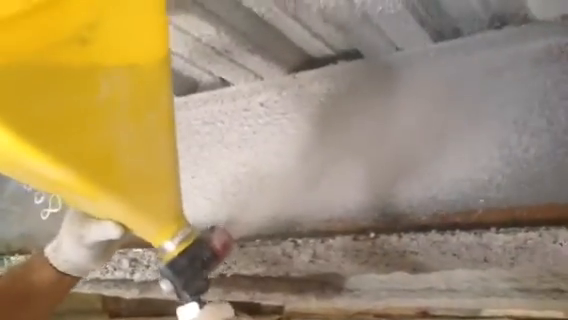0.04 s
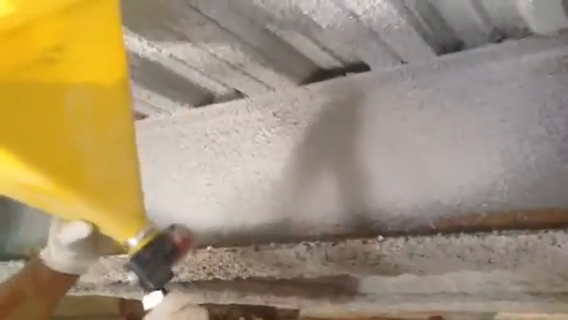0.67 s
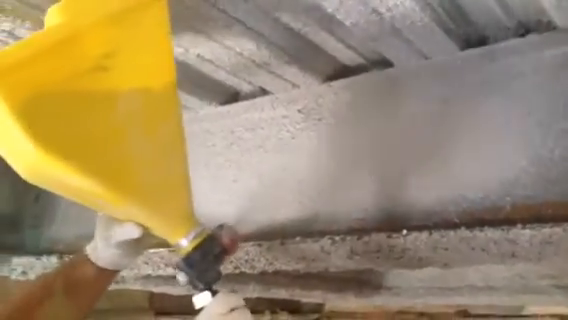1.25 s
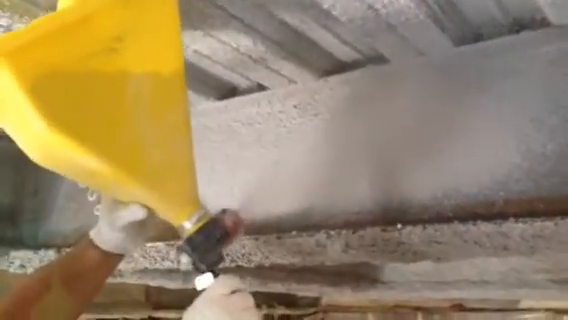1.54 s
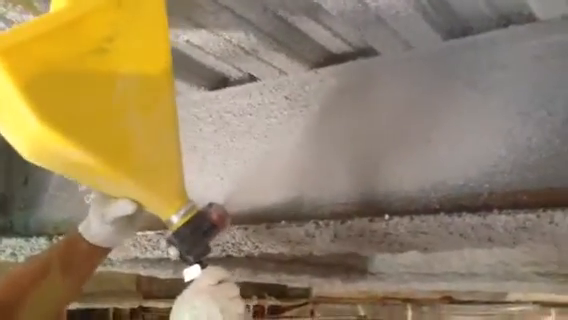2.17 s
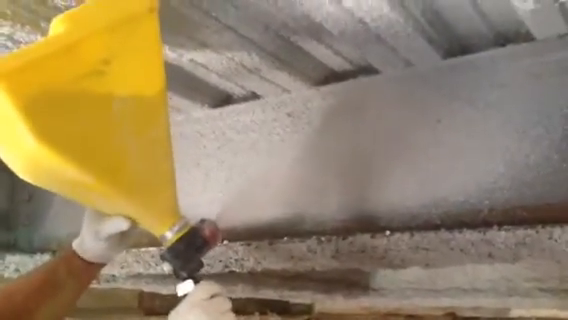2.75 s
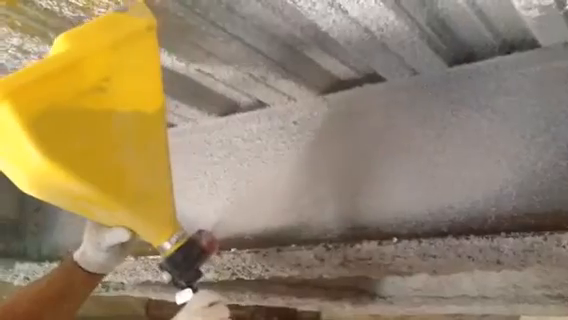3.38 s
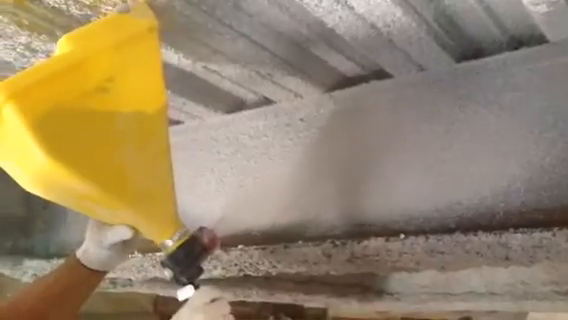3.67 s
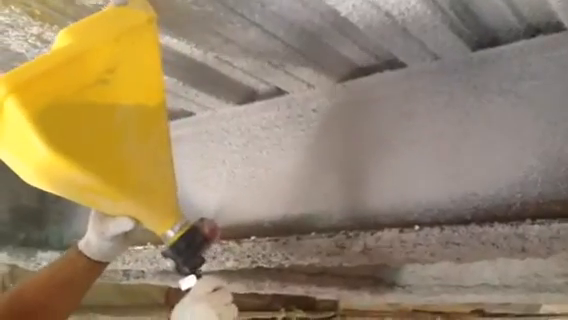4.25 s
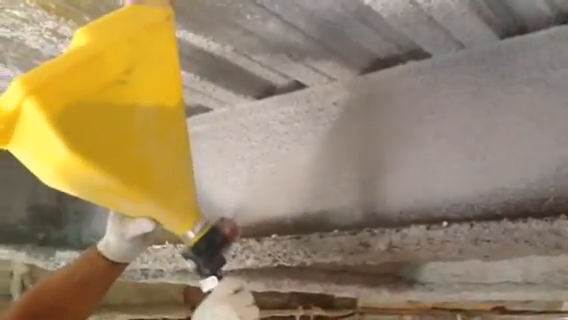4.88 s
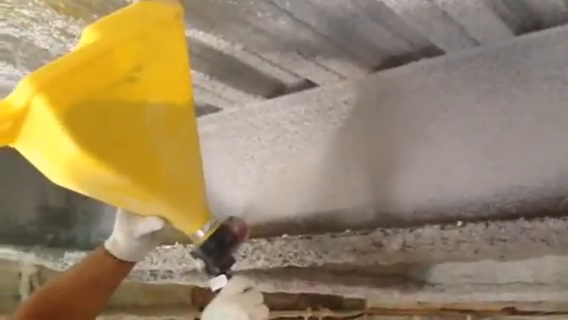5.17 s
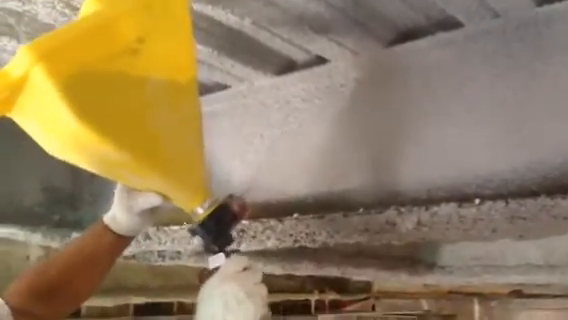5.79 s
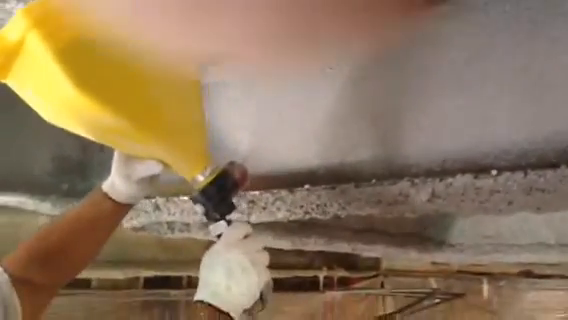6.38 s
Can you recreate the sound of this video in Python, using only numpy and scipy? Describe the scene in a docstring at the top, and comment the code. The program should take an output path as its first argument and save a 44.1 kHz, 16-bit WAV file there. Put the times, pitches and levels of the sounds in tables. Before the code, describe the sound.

A short burst of loud hiss from a nearby spray gun stops, and for a second only seeping air and a distant, humming compressor are heard in the building. Then the gun opens again abruptly and keeps spraying, a sharp rush of air with a fast, wet, gurgling splutter underneath. The sound is mono, with only a slight room echo.

```python
"""Hopper gun spraying a ceiling beam

An air-driven gun sprays wet coating; the air is shut off for a second, then opened again.
The jet hisses, coloured by the gap between gun and beam, and splutters about ten times a second
as gulps of mix drop into it. A compressor hums and clatters further off in the building. Mono."""
import sys
import numpy as np
from scipy import signal
from scipy.fft import rfft, irfft, next_fast_len
from scipy.io import wavfile
from scipy.ndimage import uniform_filter1d, map_coordinates

SR = 44100
rng = np.random.default_rng(int(sys.argv[2]) if len(sys.argv) > 2 else 0)


def store_wav(level_fs):
    """Save 16-bit WAV to argv[1]."""
    pcm = np.round(np.clip(np.atleast_2d(level_fs), -1, 1) * 32767)
    wavfile.write(sys.argv[1], SR, pcm.T.astype(np.int16))


N = 292383
T = np.arange(N) / SR
HZ, FRAMES, _ = signal.stft(T, SR, nperseg=1024)  # frequency and time grid of the moving filters
SHUT_S, OPEN_S = .21, 1.2865  # the air valve


def jet(swing_db):
    """Air tears through the nozzle, brighter in a surge; the resonances glide from aim to aim."""
    # strength of the jet: time_s, level_db
    jet_level = [(0.0, -14.9), (1.33, -15.6), (1.5, -16.4), (1.65, -14.5), (2.15, -16.9), (2.5, -17.1),
                 (2.6, -15.8), (2.8, -16.4), (3.0, -15.0), (3.1, -16.9), (3.25, -15.5), (3.5, -15.6),
                 (3.75, -14.4), (4.6, -16.0), (5.05, -15.2), (5.8, -15.7), (6.63, -14.9)]
    # tone of the hiss: freq_hz, level_db
    hiss = [(150, -42), (500, -18.5), (1000, -28), (2000, -10.5), (2850, -10.3), (3400, -4), (4500, -2),
            (5700, -3), (6600, -3.5), (8500, -2), (10500, -5), (12500, -7.4), (15500, -7.8)]
    # sheen on top of the hiss: time_s, brightness
    sheen = [(0.0, -2.7), (1.33, -1.1), (3.15, -2.3), (3.45, -3.8), (4.0, -4.5), (4.35, -3.6), (5.35, -4.2),
             (5.9, -2.1), (6.63, -4.1)]
    # resonances of the gap between gun and beam, one table per aim: pitch_hz, width_hz, level_db
    aim_first = [(2930, 120, -6.5), (3830, 130, -3), (4400, 150, 1), (4940, 260, 2.5), (5740, 170, 0),
                 (6430, 430, -1), (7900, 300, 0), (8630, 180, -2)]
    aim_low = [(2940, 72, -2.5), (3220, 110, -4), (3540, 68, -3), (4240, 320, -4), (5360, 280, 0),
               (6040, 110, 0), (7540, 640, -2.5), (8550, 220, -3), (9840, 690, -3)]
    aim_mid = [(3270, 50, -2.5), (3770, 110, -3.5), (4640, 400, -2), (5500, 99, -15), (5710, 200, 1.5),
               (6960, 160, -2), (8300, 240, -19), (9040, 270, -3.5), (10960, 680, -5.5)]
    aim_high = [(3470, 140, -7.5), (3870, 105, 2.5), (4320, 200, 2), (4770, 210, 1.5), (5400, 330, 2),
                (6570, 400, -1.5), (7920, 250, -1), (9200, 330, -4), (10400, 230, -7)]
    aim_late = [(3395, 140, -2.5), (3860, 130, 1), (4600, 380, -3), (4830, 140, -8), (5710, 190, -0.5),
                (6300, 200, -4), (7850, 350, -17), (9260, 210, -2.5), (9860, 160, -31)]
    aim_end = [(3480, 150, 2.3), (3950, 110, -4), (4420, 190, -4), (5680, 260, -3.5), (6400, 200, -6),
               (7450, 260, -3), (8300, 200, -8), (9000, 260, -3)]
    # when the gun reaches each aim: time_s
    aim_times = [.1, 1.75, 2.8, 4.3, 5.6, 6.3]
    aims = [aim_first, aim_low, aim_mid, aim_high, aim_late, aim_end]
    fades = [np.interp(FRAMES, aim_times, row) for row in np.eye(len(aims))]
    ringing = sum(resonances(aim) * fade for aim, fade in zip(aims, fades))
    brightness = curves(sheen, FRAMES)[0] + .3 * np.interp(FRAMES, T, swing_db)
    treble = np.clip((HZ[:, None] - 5000) / 3000, 0, 1)
    tone = np.sqrt(colour(hiss) ** 2 + amp(3.5) ** 2 * ringing) * hollow(width_hz=220)
    tone *= amp(1.1 * (brightness + .9) * treble)
    tone *= reflections(beam=.19, ribs=.31, drift_s=.00007)
    flutter_db = .5 * wobble(45) + .75 * wobble(300)
    air = shaped(droplets(per_s=830, spread_db=6, level_db=-11), tone)
    return amp(curves(jet_level)[0] + swing_db + flutter_db + .25) * air


def splutter(swell):
    """Wet mix is ripped apart in ragged pops that ring the hopper throat."""
    # flow of mix: time_s, level_db
    flow = [(0.0, -27.3), (1.33, -28.2), (1.9, -27.4), (2.45, -30.2), (2.6, -27.0), (3.55, -27.7),
            (3.75, -26.2), (4.9, -26.3), (5.1, -25.0), (5.8, -25.7), (6.63, -25.9)]
    # tone of the pops: freq_hz, level_db
    pop_tone = [(100, -18), (300, -11.5), (550, -13), (670, 0.5), (750, -13.5), (950, -4.5), (1150, -1.5),
                (1400, -1.5), (1600, 2), (2000, 3.5), (2180, -2.5), (2500, -5.5), (2800, -4), (5000, -9.5),
                (12000, -21)]
    # throat resonances (gurgle, ring, gulp, overtone): pitch_hz, width_hz, level_db
    throat_modes = [(830, 53, 0.5), (1910, 170, -1.5), (1023, 133, 0), (2377, 106, 1.5)]
    # filling of the throat, which lifts or damps the first two: time_s, gurgle_db, ring_db
    fill = [(0, 0, -6), (1.4, -4, 16), (1.65, 6, 12), (2.3, 4.5, 7), (3.2, 6.5, 3), (3.8, -4, -3),
            (6.63, -11, -5)]
    lifts_db = curves(fill, FRAMES) + [0, 0]
    throat = sum(resonances([mode]) * amp(db) ** 2 for mode, db in zip(throat_modes, lifts_db))
    tone = np.sqrt(colour(pop_tone) ** 2 + throat) * hollow(width_hz=130)
    tone *= reflections(beam=.1, ribs=.3, drift_s=.00025)
    tone /= np.sqrt(1 + (100 / (HZ[:, None] + 1)) ** 6)  # low cut at 100 Hz
    pops = unit(droplets(per_s=400, spread_db=2.5, level_db=-5) * amp(1.35 * wobble(160)))
    return amp(curves(flow)[0]) * swell * shaped(pops, tone)


def feed(steepness):
    """Each gulp of mix chokes the air, then the nozzle clears: returns splutter gain, air swing in dB."""
    # the hopper glugs like a bottle: time_s, gulps_per_s
    gulp_rate = [(0.2, 9.7), (1.32, 13.68), (1.57, 10.2), (1.77, 13.78), (1.94, 10.66), (2.35, 9.16),
                 (2.57, 10.15), (3.12, 10.34), (3.69, 8.96), (3.82, 11.07), (4.25, 9.86), (4.46, 11.39),
                 (4.93, 10.51), (5.17, 8.93), (5.52, 13.9), (5.65, 9.35), (5.99, 9.67), (6.6, 8.47)]
    # the air ducks in a gulp and surges between gulps: time_s, choke_db, surge_db
    air_swing = [(0, .6, 0), (1.35, .6, 1.6), (2.35, .7, 4), (2.6, .7, 0), (5.2, 1, 0), (6, 2.6, 0),
                 (6.25, 0, 0)]
    # thin stream between gulps, relative to the flow: time_s, level_db
    stream = [(0, -3.5), (1.4, -7), (2.7, -3), (4.2, -3), (5.2, -4.5)]
    # extra hard spits, over an ordinary gulp: time_s, boost_db
    spits = [(1.315, 2.5), (1.468, 2.5), (1.89, 2.5), (4.744, 3), (5.138, 2), (5.335, 2.5), (5.986, 2.5)]
    first_gulp_s, restart_gulp_s, spit_half_s = .051, 1.32, .03
    gulp_share, surge_share = .52, .3  # widths, as parts of a cycle
    gulp_db, scatter_db = 2.3, .7
    cycles = np.cumsum(curves(gulp_rate)[0]) / SR
    cycles -= np.interp(np.where(T < OPEN_S, first_gulp_s, restart_gulp_s), T, cycles)
    from_gulp = abs((cycles + .5) % 1 - .5)
    gulp = .5 ** ((2 * from_gulp / gulp_share) ** steepness)
    surge = np.exp(-((1 - 2 * from_gulp) / surge_share) ** 2)
    choke_db, surge_db = curves(air_swing)
    swing_db = surge_db * surge - choke_db * gulp
    spit_db = sum(db / (1 + ((T - s) / spit_half_s) ** 2) ** 2 for s, db in spits)
    gulp_gain = amp(gulp_db + spit_db + scatter_db * wobble(10)) * np.sqrt(gulp)
    swell = np.hypot(gulp_gain, amp(curves(stream)[0]))
    return swell, swing_db - uniform_filter1d(swing_db, SR // 3)


def droplets(per_s, spread_db, level_db):
    """Turbulence with the ticks of bursting drops on it."""
    ticks = (rng.random(N) < per_s / SR) * rng.choice([-1, 1], N)
    sizes = amp(spread_db * np.clip(noise(), -2, 2))
    return noise() + amp(level_db) * unit(ticks * sizes)


def valve(fall_db_per_s=560, rise_s=.01):
    """Air pressure at the nozzle, 0-1: it dies away when shut and snaps back when opened."""
    return amp(-fall_db_per_s * np.maximum(T - SHUT_S, 0)) + np.clip((T - OPEN_S) / rise_s, 0, 1)


def reflections(beam, ribs, drift_s, far_edge_s=.000205):
    """Moving comb: echoes off two edges of the beam and the ceiling ribs, shifting as the hand sways."""
    # echo off the beam as the gun moves along it: time_s, delay_s, far_edge_share
    beam_echo = [(0, .00105, .8), (1.3, .00099, .7), (1.75, .000942, .8), (2.6, .000895, .7),
                 (3.05, .000888, .7), (3.6, .00088, .1), (4.2, .000862, 0), (5.1, .000878, .2),
                 (5.8, .000887, .2), (6.63, .00102, .8)]
    echo = lambda delay_s: np.exp(-2j * np.pi * HZ[:, None] * delay_s)
    near_s, far_share = curves(beam_echo, FRAMES)
    edges = 1 + beam * ((1 - far_share) * echo(near_s) + far_share * echo(near_s + far_edge_s))
    rib_echoes = sum(ribs * echo(delay_s * rng.uniform(.9, 1.1) + drift_s * wobble(1.3, FRAMES))
                     for delay_s in np.linspace(.0025, .011, 8))
    return abs(edges * (1 + rib_echoes))


def hollow(width_hz):
    """Moving notch where direct and reflected sound cancel; a negative depth makes it a bump."""
    # scoop below the main hiss, deeper as the gun turns upward: time_s, centre_hz, depth_db
    notch = [(0, 2640, -1), (1.5, 2600, -5.5), (2.1, 2680, 2), (3.2, 2730, -1), (4.2, 2720, 2),
             (5.2, 2940, 5), (5.9, 2900, 7), (6.63, 2870, -1)]
    centre_hz, depth_db = curves(notch, FRAMES)
    return amp(-depth_db * np.exp(-((HZ[:, None] - centre_hz) / width_hz) ** 2))


def room(x, t60_s):
    """Short diffuse answer of the ceiling and walls."""
    t = T[:SR // 2]
    tail = rng.standard_normal(len(t)) * amp(-60 * t / t60_s)
    return signal.fftconvolve(x, tail / np.linalg.norm(tail))[:N]


def compressor(shaft_hz=55.22, phase_scatter_rad=.6, rumble_db=-2.5, clatter_db=.7):
    """Piston strokes: shaft harmonics over a rumble, thin whining tones, valve clatter twice a turn."""
    # partials of the hum: shaft_multiple, level_db
    orders = [(1, -5), (1.5, -21), (2, -13.5), (3, -0.5), (4, -13), (4.5, -9.5), (5, -8), (6, -9.5),
              (7, -8), (8, -7), (9, -8.5), (11, -14)]
    # whining tones: pitch_hz, level_db
    whine_tones = [(883, 0), (974, -8), (1157, -11), (1297, -3), (1437, -11), (1490, -8), (1685, -6),
                   (1960, -9), (3063, -9), (3289, -11)]
    # tone of the rumble and of the clatter: freq_hz, level_db
    rumble_tone = [(20, -45), (40, -28), (60, -15), (95, -6), (140, 6), (200, 9.5), (300, 1), (500, -2),
                   (800, -6), (2000, -48)]
    clatter_tone = [(250, -20), (400, -5.5), (560, -15), (650, -1), (850, -7.5), (1030, 1), (1130, -0.5),
                    (1400, 2), (1500, -2), (1950, 1), (2130, -4), (3100, -8), (5000, -13), (10000, -30)]
    # faders for the pistons and for the whine, which swells in the pause: time_s, gain_db
    piston_fader = [(0, -45.2), (2.5, -45.2), (6.63, -42.8)]
    whine_fader = [(.35, -56), (.7, -47.5), (1.3, -49), (1.6, -56)]
    turn = 2 * np.pi * np.cumsum(shaft_hz * (1 + .00098 * wobble(2.96))) / SR
    hum = unit(sum(-amp(db + .8 * wobble(5)) * np.cos(order * turn + phase_scatter_rad * rng.normal())
                   for order, db in orders))
    whine = sum(amp(db + 2.2 * wobble(7.9)) * np.sin(hz / shaft_hz * turn + .6 * wobble(17))
                for hz, db in whine_tones)
    rumble = shaped(noise(), colour(rumble_tone))
    strokes = 1 + .13 * np.cos(2 * turn) + .07 * np.cos(turn)
    clatter = shaped(noise() * strokes, colour(clatter_tone))
    pistons = hum + amp(rumble_db) * rumble + amp(clatter_db) * clatter
    return amp(curves(piston_fader)[0]) * pistons + amp(curves(whine_fader)[0]) * whine


def leak(seep_db=-51.3, puff_db=-42.5, puff_at_s=1.137, puff_length_s=.03):
    """A little air seeps steadily past the valve, with a small puff before it opens."""
    # tone of the seeping air: freq_hz, level_db
    leak_tone = [(1470, -21), (2500, -9.5), (4530, -5.5), (4890, -8), (5200, -7), (9730, -15.5),
                 (11200, -26), (15500, -36)]
    puff = amp(puff_db) / (1 + (2 * (T - puff_at_s) / puff_length_s) ** 2)
    return np.hypot(amp(seep_db), puff) * shaped(noise(), colour(leak_tone))


def bass_dip(x, start_s=1.29, onset_s=.09, recover_s=.21, floor_db=-17, steepness=3.4):
    """The bass drops out just after the air opens and returns from the top down."""
    age = np.maximum(FRAMES - start_s, 0)
    corner_hz = 1050 * np.minimum(age / onset_s, 1) ** 2 / (1 + (age / recover_s) ** 2)
    kept = 1 / (1 + (corner_hz / np.maximum(HZ, HZ[1])[:, None]) ** steepness)
    spectrum = signal.stft(x, nperseg=1024)[2]
    return signal.istft(spectrum * np.sqrt(kept + (1 - kept) * amp(floor_db) ** 2))[1][:, :N]


def gain_control(x, lift_db=3.7, threshold_db=-30, release_db_per_s=4.2, attack_s=.06):
    """The gain creeps up while it is quiet and is pulled back quickly by a loud sound."""
    level_db = 10 * np.log10(abs(uniform_filter1d(x[0] ** 2, SR // 200)) + 1e-12)
    over_db = np.clip(level_db - threshold_db, 0, lift_db)
    release_db = release_db_per_s * T
    cut_db = np.maximum.accumulate(over_db + release_db) - release_db
    pole = np.exp(-1 / (attack_s * SR))
    return x * amp(signal.lfilter([1 - pole], [1, -pole], lift_db - cut_db))


def amp(db):
    """Decibels to gain."""
    return 10 ** (np.asarray(db) / 20)


def unit(x):
    """Scale to rms 1."""
    return x / np.sqrt(np.mean(x ** 2) + 1e-20)


def noise():
    """White noise."""
    return rng.standard_normal(N)


def curves(rows, t=T):
    """Each column after the time, read at times t."""
    times, *columns = np.transpose(rows)
    return [np.interp(t, times, column) for column in columns]


def wobble(rate, t=T):
    """A smooth random curve, rate knots a second."""
    knots = rng.standard_normal(int(t[-1] * rate) + 4)
    steps = np.arange(0, len(knots) - 1, 1 / 8)
    return np.interp(t * rate, steps, map_coordinates(knots, [steps]))


def colour(points):
    """Gain per frequency from (freq_hz, level_db) points."""
    hz, db = np.transpose(points)
    return amp(np.interp(np.log(HZ + 1), np.log(hz), db))[:, None]


def resonances(modes):
    """Power per frequency of a set of steep-sided resonances."""
    return sum(amp(db) ** 2 / (1 + (1.3 * (HZ - hz) / width) ** 2) ** 2
               for hz, width, db in modes)[:, None]


def shaped(x, gain):
    """x through a fixed or moving filter that keeps its power; rms 1."""
    spectrum = signal.stft(x, nperseg=1024)[2]
    return unit(signal.istft(spectrum * gain / np.sqrt(np.mean(gain ** 2, axis=0)))[1][:N])


def scene():
    """Gun, room, leak and compressor, alike in both channels."""
    swell, swing_db = feed(steepness=3.4)
    gun = valve() * (jet(swing_db) + splutter(swell))
    mix = gun + amp(-22.5) * room(gun, t60_s=.33) + leak() + compressor()
    return np.array([mix, mix])


def record(dry):
    """The bass dips once, the gain rides the level, peaks are rounded and the very top is cut off."""
    ceiling, top_hz = .78, 15330
    held = gain_control(bass_dip(dry))
    rounded = held / (1 + (held / ceiling) ** 6) ** (1 / 6)
    size = next_fast_len(N + SR // 2)
    passband = np.fft.rfftfreq(size, 1 / SR) < top_hz
    return irfft(rfft(rounded, size) * passband, size)[:, :N]


dry = scene()
out = record(dry)
store_wav(out)
```